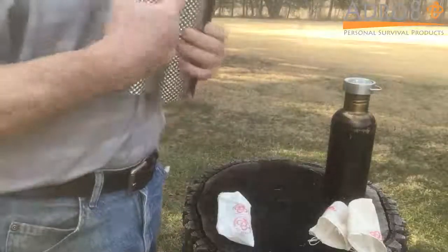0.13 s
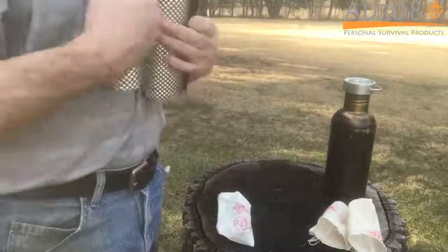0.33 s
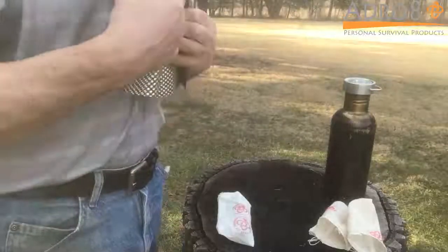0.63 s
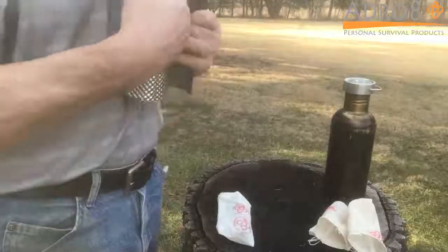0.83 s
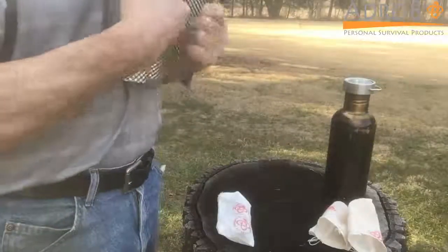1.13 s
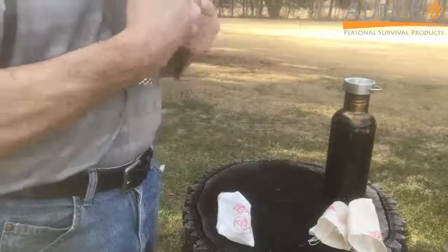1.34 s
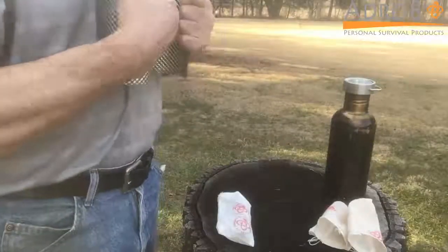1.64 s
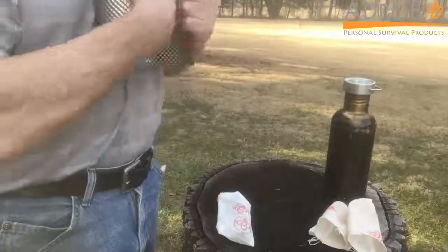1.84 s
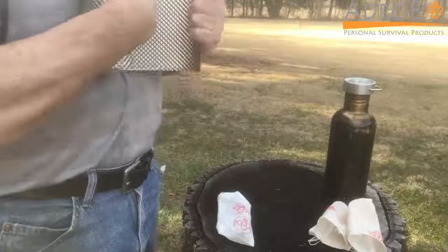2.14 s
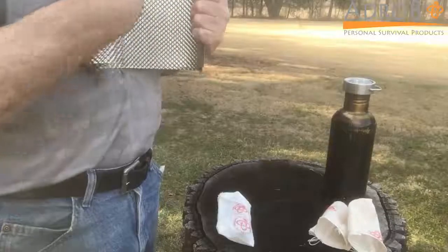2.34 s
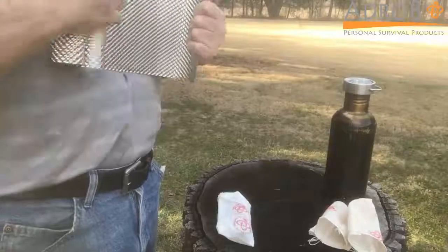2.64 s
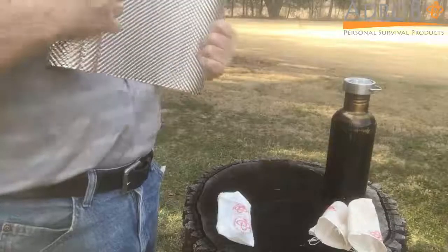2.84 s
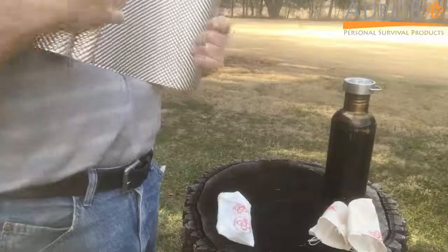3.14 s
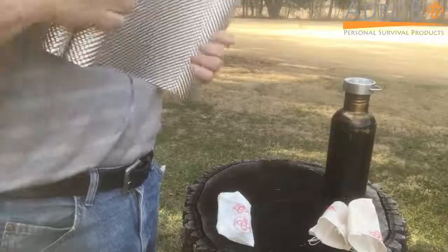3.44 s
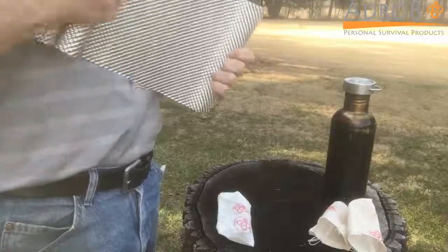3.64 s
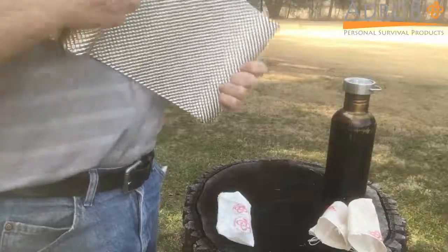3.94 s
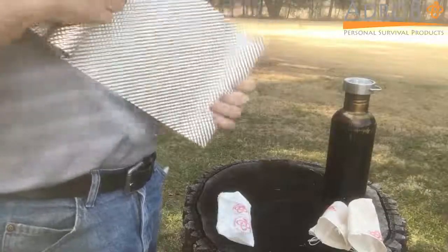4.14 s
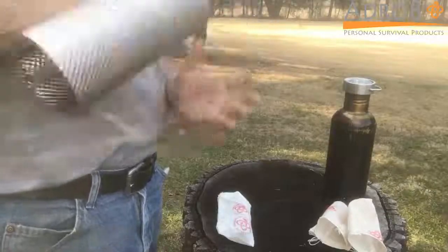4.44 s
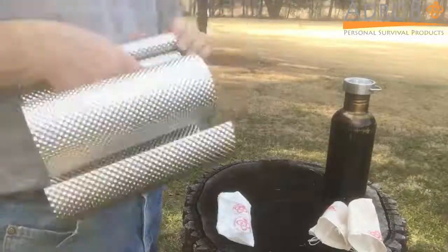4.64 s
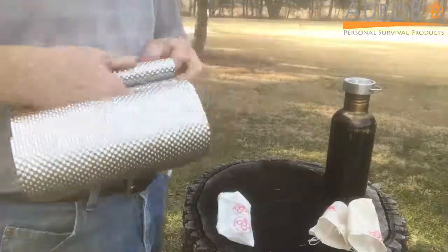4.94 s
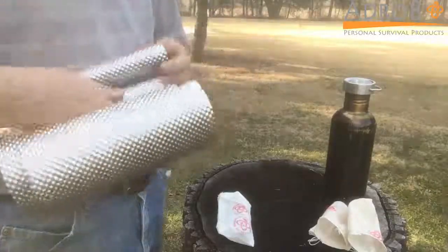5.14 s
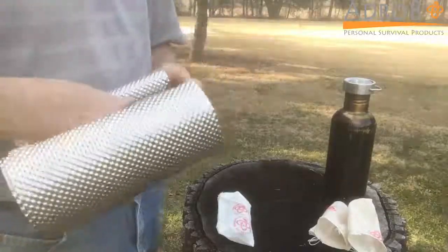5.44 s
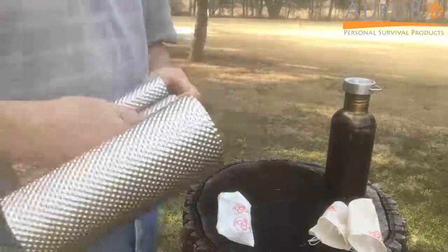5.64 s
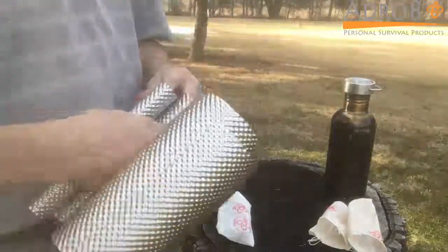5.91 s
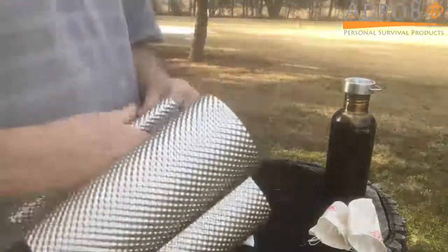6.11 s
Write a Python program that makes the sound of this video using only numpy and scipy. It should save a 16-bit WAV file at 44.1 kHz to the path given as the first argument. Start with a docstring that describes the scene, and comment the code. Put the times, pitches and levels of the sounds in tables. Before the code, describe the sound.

Sharp tinny pops and rasping crinkles of flexed dimpled foil, with a hollow tube-like tinge, over faint open-air hush and low wind.

```python
"""Hands roll thin embossed metal sheets into a tube in the open air, close to a small microphone.
From the start, dents snap in quick cascades, each ringing a patch of sheet, over an outdoor hush and rumbling wind.
Small dents crowd in while the metal slides; the air in the roll adds a hollow note, weaker after 2 s.
From 3.2 s single puffs push the microphone, and near 4.5 s the swinging roll fans it.
After 4.9 s the hollow note is stronger again and climbs, then drops away just after 6 s."""
import sys
import numpy as np
from scipy import signal
from scipy.fft import rfft, irfft, next_fast_len
from scipy.io import wavfile

SR = 44100
rng = np.random.default_rng(int(sys.argv[2]) if len(sys.argv) > 2 else 0)


def unload_wav(signal):
    """Save mono or channel-first audio to the path in sys.argv[1] as 16-bit WAV at rate SR, clipped to [-1, 1]."""
    wavfile.write(
        sys.argv[1],
        SR,
        np.round(np.clip(np.atleast_2d(signal).T, -1, 1) * 32767).astype(np.int16),
    )


N = 276507  # length of the sound in samples


def amp(db):
    """Turn decibels into an amplitude factor; amp(2 * db) is the power factor."""
    return 10 ** (np.asarray(db) / 20)


def evened(x):
    """Scale a signal to rms 1."""
    return x / np.sqrt(np.mean(x ** 2, -1, keepdims=True) + 1e-20)


def read(points, hz):
    """Read a curve at the given pitches, with pitch on a logarithmic scale."""
    f, value = np.transpose(points)
    return np.interp(np.log(hz + 1), np.log(f + 1), value)


def along(points):
    """Draw straight lines between (time, value) points, one value per sample."""
    return np.interp(np.arange(N) / SR, *np.transpose(points))


def coloured(points):
    """Steady noise of rms 1 with the given spectrum."""
    size = next_fast_len(N)
    gain = amp(read(points, np.fft.rfftfreq(size, 1 / SR)))
    noise = irfft(rfft(rng.standard_normal(size)) * gain, size)
    return evened(noise[:N])


# Spectrum of the outdoor hush: pitch_hz [Hz], level_db [relative dB per Hz]
AIR_SPECTRUM = [(88, -37), (150, 1), (291, -13), (871, -14.5), (1660, -16.5), (12700, -37), (16000, -35)]


def outdoor_hush():
    """Steady background noise of the open air, at an rms level of -60.5 dB."""
    return amp(-60.5) * coloured(AIR_SPECTRUM)


# Spectrum of the wind rumble: pitch_hz [Hz], level_db [relative dB per Hz]
WIND_SPECTRUM = [(15, -40), (30, -7), (55, 7), (120, -2), (300, -24), (800, -38)]
# Puffs of wind and of air pushed by the sheet:
# middle_s [s], envelope_peak_db [dB], pitch_hz [Hz], length_s [s]
PUFFS = [(3.208, -42, 94, 0.026), (3.599, -40, 60, 0.032), (4.428, -27.5, 70.6, 0.0081),
         (4.449, -39, 70, 0.062), (4.457, -20, 353, 0.0026), (4.47, -40, 135, 0.055),
         (4.547, -45, 50, 0.06), (5.157, -45, 54, 0.041), (6.122, -39, 65, 0.018), (6.25, -41, 191, 0.024)]


def wind():
    """Low noise of uneven strength, plus short sine pulses that push the microphone."""
    t = np.arange(N) / SR
    lumps_db = 3.0 * coloured([(1, -15), (6, 16), (20, 2), (60, -77.5)])
    # the roll swings round and fans the microphone: up to 7 dB more, around 4.53 s
    swing_db = 7 * np.exp(-((t - 4.53) / .13) ** 4)
    out = amp(-59 + lumps_db + swing_db) * coloured(WIND_SPECTRUM)
    for middle_s, peak_db, hz, length_s in PUFFS:
        lag_s = t - middle_s
        envelope = amp(peak_db) * np.exp(-(2 * lag_s / length_s) ** 2)
        out = out + envelope * np.sin(2 * np.pi * hz * lag_s)
    return out


# Hollow note of the roll: time_s [s], pitch_hz [Hz], strength_db [dB]
ROLL = [(0, 657, 6), (2.05, 681, 4), (2.3, 876, -12), (4.9, 861, -0.5), (5.148, 917, 3), (5.35, 1125, 2.5),
        (5.85, 1163, 4.5), (6.05, 1240, -3), (6.15, 910, -32)]


def hollow(x, width_hz):
    """The air column in the roll: a resonance that follows the roll's shape."""
    s, hz, db = np.transpose(ROLL)
    turn = np.exp(2j * np.pi * np.cumsum(along(np.c_[s, hz])) / SR)
    r = np.exp(-np.pi * width_hz / SR)
    # shift the moving note down to 0 Hz, smooth it there, shift it back up
    smoothed = signal.lfilter([1 - r], [1, -r], x / turn)
    note = 2 * (turn * smoothed).real
    return amp(along(np.c_[s, db])) * note


# Strength of the sheet's modes: pitch_hz [Hz], level_db [relative dB]
SHEET = [(88, -53), (150, -22.5), (334, -18.5), (504, -11.5), (662, -6), (888, 0), (1360, -4), (3040, -7.5),
         (4860, -16), (9440, -13.5), (15100, -16), (16000, -3.5)]
# How long the modes ring: pitch_hz [Hz], t60_s [s to fall 60 dB; under 0.003 counts as 0.003]
RING = [(300, 0.064), (1000, 0.043), (2800, 0.025), (7000, 0.013), (15000, 0.0014)]


def patches(lo_hz, hi_hz, count, size):
    """Rings of different patches of the sheet in one register: many unrelated dying modes, energy 1."""
    t = np.arange(1536) / SR
    out = []
    for place, phase in rng.random((count, 2, size, 1)):
        hz = lo_hz + (hi_hz - lo_hz) * place
        # bending waves are slower in the bass, so low modes build up later
        rise = 1 - np.exp(-t * hz / 0.61)
        t60_s = np.maximum(read(RING, hz), .003)
        fade = amp(read(SHEET, hz) - 60 * t / t60_s)
        modes = rise * fade * np.sin(2 * np.pi * (hz * t + phase))
        out.append(modes.sum(0))
    return out / np.linalg.norm(out, axis=1, keepdims=True)


def slips(per_s, t60):
    """The embossed faces catch and let go: sudden starts that die away, mean power 1."""
    sizes = amp(2 * 2.07 * np.minimum(rng.exponential(1, N), 3))
    starts = sizes * (rng.random(N) < per_s / SR)
    bursts = signal.lfilter([1], [1, -amp(-120 / (t60 * SR))], starts)
    steady = 0.13
    return steady + (1 - steady) * bursts / bursts.mean()


# Dents under the sliding hands: time_s [s], level_db [dB, before each register's offset]
SLIDING = [(0.0, -34.5), (0.15, -61), (0.8, -70.5), (0.93, -50), (1.22, -39.5), (1.42, -42), (1.6, -67),
           (1.96, -45), (2.35, -70), (2.55, -110), (2.74, -47), (3.13, -70), (3.53, -55.5), (3.72, -70),
           (4.31, -56.5), (4.51, -36), (4.7, -65.5), (5.09, -35), (5.29, -77), (5.5, -58), (5.88, -75),
           (6.1, -44.5)]


def sliding():
    """Power of the small dents that crowd in while the metal slides, in body, middle and treble."""
    offset_db = np.array([[1.5], [-2.5], [-4.]])
    return amp(2 * (along(SLIDING) + offset_db))


# Sudden cascades: peak_s [s], level_db [dB over 1.4 kHz], body_db [dB under 1.4 kHz, relative to level_db],
# dying_ms [ms to fall 60 dB, before HASTE]
SNAPS = [(0.053, -22.5, -9.5, 59), (0.104, -42.5, 0.4, 35), (0.139, -46.5, 2, 19), (0.584, -39, -2.5, 83),
         (0.65, -44.5, 2, 56), (0.698, -28.5, 1, 18), (0.726, -25, 5, 39), (0.738, -20, 0.5, 48),
         (0.865, -51.5, 8, 25), (0.879, -33, 4, 270), (0.901, -27, 0.5, 74), (0.944, -32.5, 4, 170),
         (1.022, -22.5, 2.5, 57), (1.079, -25.5, 2, 47), (1.278, -32.5, -2, 45), (1.343, -31.5, 5, 140),
         (1.42, -35, -1, 26), (1.524, -18.5, 2.2, 79), (1.765, -29, 0.4, 230), (1.815, -22.5, 0.5, 24),
         (1.847, -34.5, 1, 20), (1.912, -29.5, 0.3, 66), (1.954, -31.5, 3, 28), (1.971, -23, 0, 70),
         (1.99, -20, 4.5, 113), (2.011, -21.5, -1.5, 61), (2.105, -36, -1.5, 57), (2.146, -17.5, -2.5, 34),
         (2.275, -17, -1.5, 44), (2.367, -22, 6.5, 15), (2.446, -42.5, 2.5, 23), (2.517, -47.5, 4, 40),
         (2.62, -51, 4.5, 27), (2.695, -50, 6, 49), (2.734, -12.5, -4.5, 92), (2.817, -26.5, -3, 8.1),
         (2.83, -21, -1, 56), (2.844, -29, -2.1, 25), (2.872, -27.5, -0.8, 40), (2.96, -42, -2, 31),
         (3.097, -31.5, 1, 23), (3.111, -21.5, 1.5, 36), (3.126, -15, -9, 40), (3.139, -20, -7.5, 50),
         (3.361, -34.5, -13, 146), (3.549, -27.5, -10.5, 39), (3.662, -37, -11, 39), (3.685, -35, 0, 89),
         (3.774, -20, -1.1, 19), (4.067, -36, -1.5, 63), (4.249, -41.5, -2, 7.4), (4.284, -41, -23, 8),
         (4.497, -18, -21, 10), (4.514, -15, -6.5, 103), (4.672, -19, -3.5, 106), (4.728, -22, 1, 40),
         (4.788, -11, -2.5, 91), (4.83, -25, 0.5, 93), (4.932, -39, -20, 24), (5.046, -18, -3.5, 73),
         (5.14, -26, -7, 66), (5.19, -19, -5, 220), (5.315, -25.5, -2.5, 55), (5.461, -44.5, 2.5, 180),
         (5.518, -30, 0.3, 780), (5.757, -25.5, -1, 640), (6.034, -16, -0.5, 82), (6.077, -19.5, -14, 40),
         (6.194, -20, 1, 140), (6.219, -21.5, 1.5, 160)]
# Cascades that build up as the sheet bends: peak_s [s], level_db [dB over 1.4 kHz],
# swell_ms [ms to rise 60 dB], dying_ms [ms to fall 60 dB, before HASTE]
CRINKLES = [(0.025, -31, 94, 110), (0.188, -42, 61, 120), (0.282, -46, 81, 30), (0.344, -34, 73, 126),
            (0.451, -41.5, 31, 81), (0.735, -31, 217, 158), (0.988, -25.5, 154, 430),
            (1.106, -27.5, 62, 190), (1.131, -26, 15, 26), (1.174, -29, 77, 22), (1.38, -24, 41, 80),
            (1.496, -29.5, 122, 246), (1.622, -28, 34, 61), (1.885, -27.5, 80, 40), (2.039, -27.5, 49, 63),
            (2.067, -31.5, 45, 51), (2.221, -29.5, 40, 78), (2.335, -30.5, 59, 49), (2.4, -37, 86, 160),
            (2.424, -40, 30, 34), (2.574, -43, 290, 59), (2.859, -29.5, 110, 18), (2.994, -40.5, 55, 160),
            (3.044, -39.5, 30, 55), (3.215, -43.5, 140, 69), (3.302, -28, 65, 150), (3.344, -25, 127, 89),
            (3.454, -27.5, 72, 97), (3.829, -54.5, 660, 350), (3.93, -54.8, 36, 180),
            (4.353, -35.5, 147, 39), (4.382, -32.5, 105, 1100), (4.466, -14, 137, 127),
            (4.568, -30, 160, 130), (4.743, -18.5, 52, 80), (4.994, -33.5, 180, 140), (5.16, -29, 52, 590),
            (5.224, -24, 110, 280), (5.353, -27.5, 86, 75), (5.407, -27.5, 240, 156),
            (5.604, -37, 260, 170), (5.622, -32.5, 25, 200), (5.675, -27, 53, 70), (5.733, -47, 38, 100),
            (5.812, -23, 330, 225), (5.873, -25, 67, 37), (5.959, -37, 36, 230), (6.02, -31.5, 190, 160),
            (6.19, -25, 260, 420)]
# Colour of the sheet as it is turned and curled: time_s [s], body_db [dB, for crinkles],
# treble_db [dB, share over 4 kHz]
COLOUR = [(0, -6.5, -7), (0.6, 0, -4.5), (1.3, -2.4, -7), (1.7, 4.5, -5), (2.4, 0.5, -4.5),
          (3.0, -2.1, -5.5), (3.6, -3, -3), (4.4, -3, -4.5), (5.3, -0.4, -5), (5.65, -0.2, -6),
          (6.27, 2.5, -3)]


def cascades():
    """Gather all cascades as (peak s, level dB, body dB, treble dB, swell ms, dying ms)."""
    when, body, treble = np.transpose(COLOUR)
    out = []
    for s, db, body_db, die_ms in SNAPS:
        # a short snap swells gently, a long one starts hard (490 is in ms squared)
        swell_ms = np.clip(490 / die_ms, 4, 17)
        out.append((s, db, body_db, np.interp(s, when, treble), swell_ms, die_ms))
    for s, db, swell_ms, die_ms in CRINKLES:
        body_db, treble_db = np.interp(s, when, body), np.interp(s, when, treble)
        out.append((s, db, body_db, treble_db, swell_ms, die_ms))
    return out


# The body of a cascade lasts, its treble dies first:
# speed of dying [factor], one row each for body, middle, treble
HASTE = np.array([[.85], [.95], [1.15]])


def effort():
    """Power with which dents snap in body, middle and treble: sliding plus the cascades."""
    t = np.arange(N) / SR
    slide = sliding()
    rasp = 0.23  # share of the sliding that rasps on evenly
    slipping, direct = (1 - rasp) * slide, rasp * slide
    for s, db, body_db, treble_db, swell_ms, die_ms in cascades():
        # work within a quarter of a second of the peak
        near = slice(max(round(s * SR) - SR // 4, 0), round(s * SR) + SR // 4)
        lag_ms = 1000 * (t[near] - s)
        swelling = -lag_ms / max(swell_ms, 2)
        dying = lag_ms / max(die_ms, 4) * HASTE
        shape = amp(2 * -60 * np.where(lag_ms < 0, swelling, dying))
        bright = amp(2 * treble_db)
        shares = amp(2 * db) * np.array([[amp(2 * body_db)], [max(1 - bright, .1)], [bright]])
        # slow cascades catch and slip, quick ones run through
        loose = np.clip(swell_ms / 45, .3, .62)
        slipping[:, near] += loose * shares * shape
        direct[:, near] += (1 - loose) * shares * shape
        # the quicker the swell, the harder the crack at its peak
        crack = (lag_ms >= 0) * np.exp(-abs(lag_ms) / 0.95) * 2.47 / (1 + swell_ms / 15)
        direct[:, near] += shares * crack
    return slipping * slips(per_s=110, t60=0.037) + direct


def sheet():
    """Random dents, a few of them larger, each ringing one patch as hard as the effort of the moment."""
    dents_per_s = 6000  # on average
    size = amp(2.85 * np.minimum(rng.exponential(1, N), 4))
    size = size * (rng.random(N) < dents_per_s / SR)
    size = size * rng.choice([-1, 1], N)  # dents pop in or out
    dents = evened(size) * np.sqrt(effort())
    registers = [patches(142.0, 1414.7, count=12, size=30),
                 patches(1390, 4070, count=12, size=45),
                 patches(3940, 15800, count=12, size=200)]
    # many dents of a moment lie in the same patch; the hands move on about 40 times a second
    moves = np.cumsum(rng.random(N) < 40 / SR)
    held = rng.integers(0, 12, N)[moves]
    patch = np.where(rng.random(N) < .4, held, rng.integers(0, 12, N))
    out = np.zeros(N)
    for force, rings in zip(dents, registers):
        for k, ring in enumerate(rings):
            out += signal.oaconvolve(force * (patch == k), ring)[:N]
    return out


def scene():
    """Add the hush, the wind, the hollow note and the metal itself, in one channel."""
    metal = sheet()
    mix = outdoor_hush() + wind() + hollow(metal, width_hz=75) + metal
    return mix[None]


def record(dry):
    """The input stage rounds off the loudest cracks; then a low-pass filter limits the band."""
    ceiling, edge_hz = .85, 15800
    soft = dry / (1 + abs(dry / ceiling) ** 4) ** (1 / 4)
    low_pass = signal.firwin(511, edge_hz, window=("kaiser", 9), fs=SR)
    return signal.oaconvolve(soft, low_pass[None], "same")


dry = scene()
out = record(dry)
unload_wav(out)
```